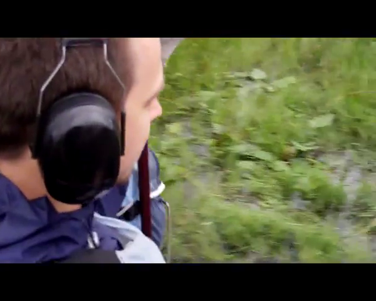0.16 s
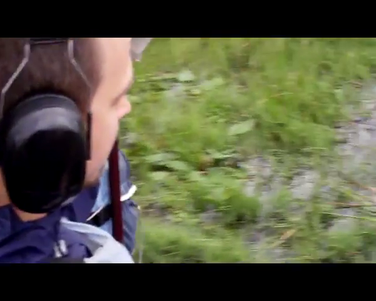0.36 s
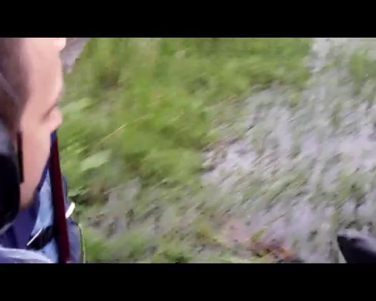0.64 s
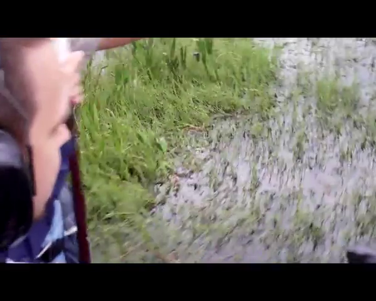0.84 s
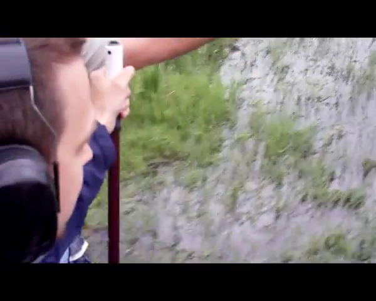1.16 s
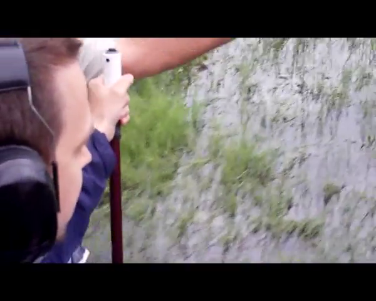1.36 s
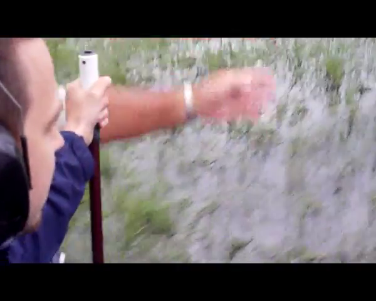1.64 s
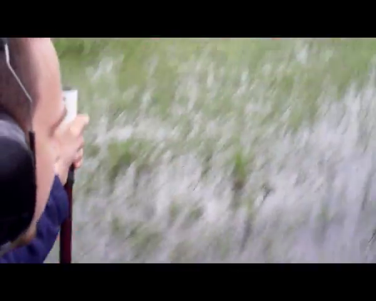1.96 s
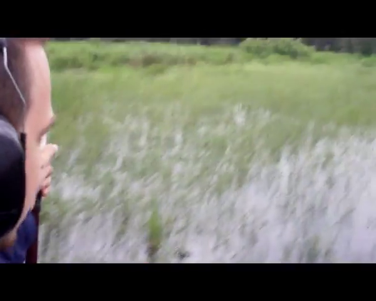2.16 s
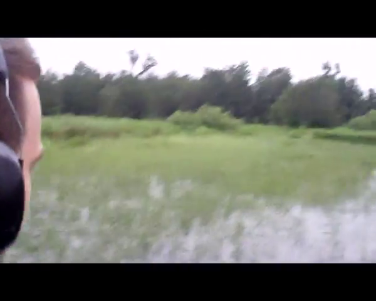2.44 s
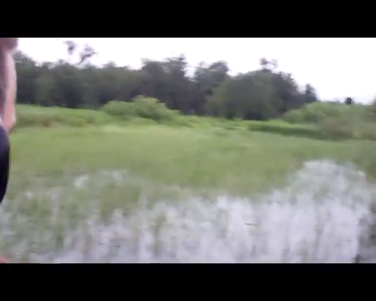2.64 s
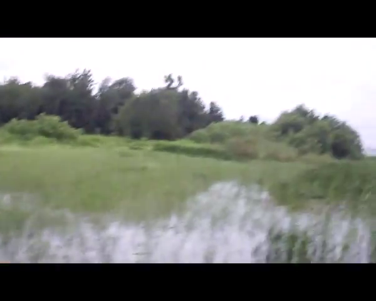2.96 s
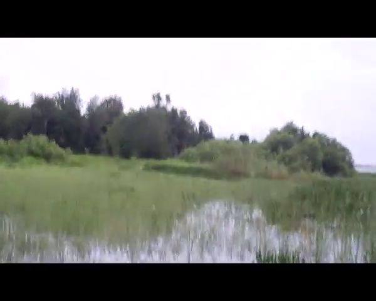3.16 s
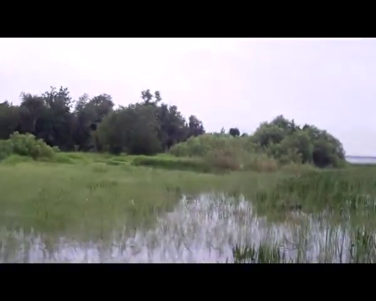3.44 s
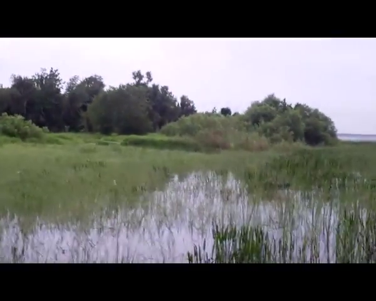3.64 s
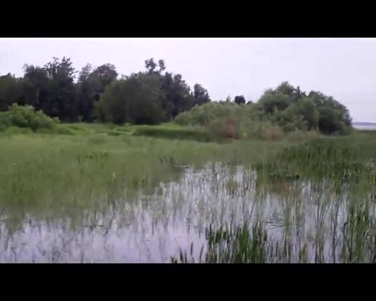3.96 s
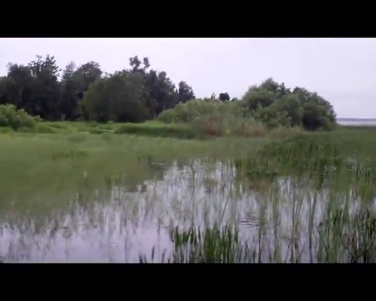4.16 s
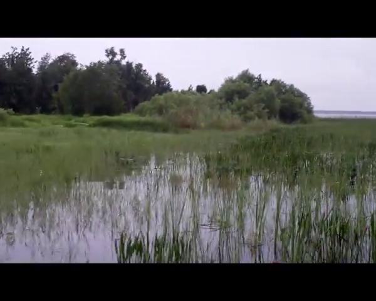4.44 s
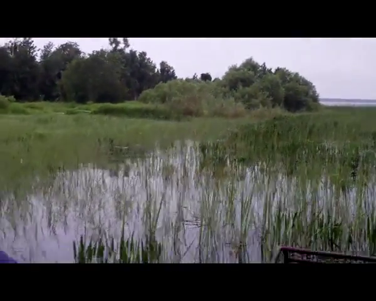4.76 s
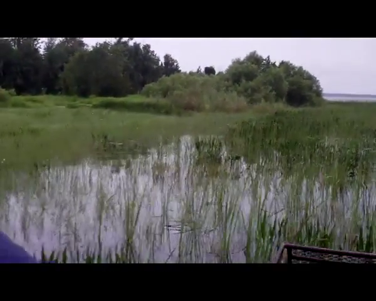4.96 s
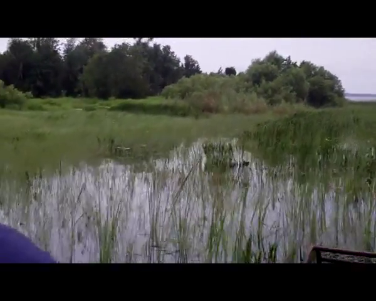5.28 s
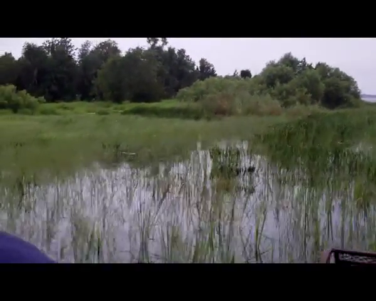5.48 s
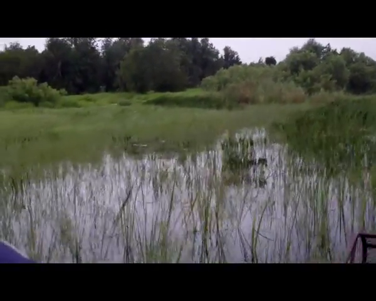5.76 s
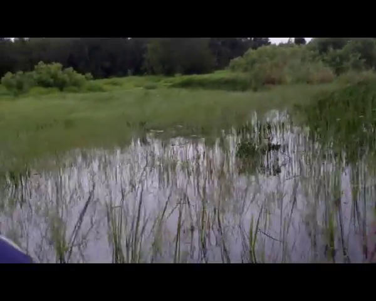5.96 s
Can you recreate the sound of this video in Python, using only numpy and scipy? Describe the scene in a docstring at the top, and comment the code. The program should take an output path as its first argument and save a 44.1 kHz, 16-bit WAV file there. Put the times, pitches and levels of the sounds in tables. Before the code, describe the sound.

A loud airboat engine and big propeller fill the whole six seconds, heard from on board in an open flooded marsh through a small handheld microphone. The exhaust is a dense, raspy buzz with strong low-mid harmonics, wrapped in rough, hissing blade and spray noise that flutters with each rapid firing, with tiny irregular pops. It begins loud, drops slightly at about 0.15 s, and the pitch sags until about 1 s, with brief midrange surges near 0.5 and 0.8 s. From 1.4 to 2.8 s the note slowly recovers while the colour shifts as the microphone turns sideways. Sharp little crackles come near 2.8 and 3.1-3.3 s. Around 3-3.7 s the throttle opens and the pitch climbs clearly; from 4 s it holds a higher, steady drone, slightly softer, cutting off still running. The sound is thin in deep bass, nearly centred, leaning slightly left later.

```python
"""A flooded marsh: an airboat engine drives a large propeller, heard on board by a small hand-held camera.
The firing note sags, then climbs as the throttle opens; the camera turns from the engine side to the bow,
which recolours exhaust and roar. Exhaust: sines at orders of the firing rate. Blades and spray: shaped noise
that rasps with each firing. Pops: one short cycle per firing. Left and right differ mainly in the lower range."""
import sys
import numpy as np
from scipy import signal
from scipy.io import wavfile
from scipy.ndimage import uniform_filter1d

SR = 44100
rng = np.random.default_rng(int(sys.argv[2]) if len(sys.argv) > 2 else 0)


def boost(x):
    """Linear amplitude factor 10**(x/20) for a level x in decibels (scalar or array-like)."""
    u = np.asarray(x, float) / 20
    return 10 ** u


def store_pcm(level_fs):
    """Save levels as 16-bit WAV."""
    pcm = np.round(np.clip(level_fs, -1, 1) * 32767).astype(np.int16)
    wavfile.write(sys.argv[1], SR, np.atleast_2d(pcm).T)


N = 269451
HOP = 256
STFT = dict(fs=SR, nperseg=1024, noverlap=1024 - HOP)

# engine firing: (time [s], rate [Hz])
FIRING_HZ = [(0.0, 111.0), (0.03, 111.6), (0.36, 107.8), (0.82, 106.1), (1.22, 106.1), (1.43, 107.1),
             (1.87, 108.4), (2.48, 109.3), (2.5, 109.9), (2.79, 110.6), (3.03, 113.5), (3.35, 121.6),
             (3.5, 124.3), (3.73, 126.7), (4.12, 128.5), (4.87, 129.2), (5.92, 128.6), (6.11, 129.0)]
# camera turn: (time [s], heading [0 back, 1 sideways, 2 turning forward, 3 bow])
CAMERA_HEADING = [(0, 0), (1.5, 0), (1.9, .44), (2.3, 1), (2.9, 1.04), (3.3, 2), (3.7, 2.5), (3.85, 3),
                  (6.11, 3)]


def curve(rows, t):
    """Reads a two-column table at times t."""
    return np.interp(t, *np.transpose(rows))


def evened(x):
    """Scales to rms 1."""
    return x / np.sqrt(np.mean(abs(x) ** 2) + 1e-20)


def bell(t, centre_s, length_s):
    """Gaussian bump, 1/e at length_s from its centre."""
    return np.exp(-((t - centre_s) / length_s) ** 2)


def band(x, order, edge_hz, kind, zero_phase=True):
    """Butterworth filter, run both ways if zero_phase."""
    sos = signal.butter(order, edge_hz, kind, fs=SR, output="sos")
    return signal.sosfiltfilt(sos, x) if zero_phase else signal.sosfilt(sos, x)


def by_heading(rows, t):
    """Blends rows of four values along the camera's heading: rows x times."""
    heading = np.clip(curve(CAMERA_HEADING, t), 0, 3)
    return np.array([np.interp(heading, np.arange(len(row)), row) for row in rows])


def across_hz(rows, hz):
    """Spreads a table of spectra over hz, on a log frequency axis."""
    f, *columns = np.transpose(rows)
    return np.transpose([np.interp(np.log(hz + 1), np.log(f), column) for column in columns])


def level_db(t):
    """Level of the whole sound at the camera: a slow curve plus set drops that creep back exponentially."""
    # slow part: (time [s], level [dB])
    slow_level = [(0, -17), (.6, -20), (1.5, -19), (2.3, -18.5), (2.8, -18.5), (3.25, -16), (3.8, -17.5),
                  (4.4, -17.5), (5, -18.5), (5.5, -19), (5.9, -18.5), (6.11, -20)]
    # the level drops at once: (time [s], change [dB])
    drops = [(0.149, -2), (2.8, -2.5), (3.275, -2.5)]
    fall_s, return_s = 0.01, 1.78
    db = curve(slow_level, t)
    for s, drop_db in drops:
        fall = np.clip((t - s) / fall_s, 0, 1)
        db = db + drop_db * fall * np.exp(-np.maximum(t - s, 0) / return_s)
    return db


def roar(turns):
    """Blade and spray turbulence: patchy noise whose middle range rasps with firings of uneven strength."""
    # spectrum of the roar: (frequency [Hz], density at headings 0, 1, 2, 3 [dB per Hz])
    roar_spectrum = [(60, -87, -86, -87, -86), (110, -65, -89, -62, -66), (165, -67, -72, -66, -65),
                     (220, -61, -60, -60, -57), (320, -50, -52.5, -46.5, -49.5),
                     (684, -44.5, -43, -43, -42), (1000, -37.5, -36.5, -37.5, -37.5),
                     (1410, -37, -35, -36.5, -37.5), (1860, -40.5, -39, -36.5, -40.5),
                     (2640, -49.5, -40.5, -42.5, -45), (2910, -45.5, -42.5, -39.5, -42),
                     (4310, -44, -50.5, -54, -51.5), (4670, -51.5, -53, -56, -56.5),
                     (5710, -52.5, -56, -57.5, -56.5), (11120, -74, -73.5, -78, -75.5)]
    # the microphone's shadow shifts as it turns: (time [s], treble [dB], presence [dB])
    mic_shadow = [(0, -3.5, 1.5), (.14, -4, 0.5), (.17, -4, -1), (.6, -1.5, 0), (1.6, -2.5, -1.5),
                  (1.95, 1, -2), (2.35, 1.5, 1), (2.85, -1, 0.5), (3.3, -1.6, -1), (4.6, -2, -0.5),
                  (5.05, -1.5, -3), (5.35, -1, -1), (6.11, 2.5, -2)]
    patchy_db, flicker_db = 0.4, 0.57  # rms
    presence_hz, treble_hz = 2360, 4140
    throb_hz, throb, triple, uneven = [900, 5500], 0.32, 0.4, 0.25

    hz, t, z = signal.stft(rng.standard_normal((2, N)), **STFT)
    patches = uniform_filter1d(rng.standard_normal(z.shape[1:]), size=14, axis=0)
    patches = evened(uniform_filter1d(patches, size=4, axis=1))
    flicker = evened(uniform_filter1d(rng.standard_normal(len(t)), size=2))

    above_presence, treble = (1 / (1 + (edge / (hz[:, None] + 1)) ** 8) for edge in (presence_hz, treble_hz))
    s, treble_db, presence_db = np.transpose(mic_shadow)
    shadow_db = (above_presence - treble) * np.interp(t, s, presence_db)
    shadow_db += treble * np.interp(t, s, treble_db)

    db = by_heading(across_hz(roar_spectrum, hz), t) + shadow_db
    db += patchy_db * patches + flicker_db * flicker
    noise = signal.istft(z * boost(db) * np.sqrt(SR / 2), **STFT)[1][:, :N]

    strength = 1 + uneven * rng.standard_normal(N)[turns.astype(int)]  # one value per firing
    puff = strength * np.sin(np.pi * turns) ** 4 - 3 / 8
    puff -= triple * np.cos(6 * np.pi * turns)  # finer rasp, three to a firing
    return noise + throb * puff * band(noise, 2, throb_hz, "band")


def pops(turns):
    """Each firing gives a one-cycle pop, pull then push, most small, sizes by chance; stray peaks join them."""
    # stray sharp peaks: (time [s], peak before the high-pass [dB])
    stray_peaks = [(.1363, -20), (.1454, -6), (.488, -11), (2.7845, -7), (2.7872, -10), (2.7951, -10),
                   (3.1305, -8), (3.2616, -14), (3.2775, -15)]
    pop_s, jitter_s = 0.00012, .0007
    small_db, spread_db = -23.5, 2  # before the high-pass, at mean level

    t = np.arange(N) / SR
    fired = np.flatnonzero(np.diff((turns + .5).astype(int)))
    late, chance = rng.random((len(fired), 2)).T
    at = np.clip(fired + np.round((late - .5) * 2 * jitter_s * SR).astype(int), 0, N - 1)
    size_db = small_db + spread_db * np.minimum(-np.log(1 - chance), 4)
    train = np.zeros(N)
    train[at] = boost(size_db + level_db(at / SR) - level_db(t).mean())
    for s, db in stray_peaks:
        train[round(s * SR)] = boost(db)
    u = np.arange(-60, 61) / SR / pop_s
    pop = u * np.exp(.5 - u ** 2 / 2)
    return band(np.convolve(train, pop, "same"), 2, 650, "high")


def exhaust(turns):
    """Sines locked to the firing; higher orders waver more, pipes and echoes scatter their phases."""
    # strongest orders: multiples of the firing rate
    strong_orders = [2, 3, 4, 5, 6, 8]
    # fixed peaks and hollows of pipes and hull that they slide through: (frequency [Hz], level [dB])
    pipe_response = [(212, -39), (223, -30), (245, -22), (258, -18), (318, -16), (326, -15.5), (335, -22),
                     (360, -8.5), (388, -9.5), (426, -15.5), (445, -11), (455, -19), (485, -13), (505, -24),
                     (516, -18), (535, -14), (560, -17), (630, -23), (645, -16), (665, -11.5), (690, -22),
                     (730, -15), (772, -20), (852, -12), (885, -19), (970, -13), (1032, -8)]
    # change of each strong order while looking sideways [dB]
    sideways_db = [-1, 0.2, -4, 0.5, -1.5, 2]
    # change of each strong order while looking at the bow [dB]
    at_bow_db = [-0.1, 0, 1.3, -4.5, 1.5, -2.1]
    # other orders, quarters from uneven cylinders:
    # (multiple of firing rate, rounded to quarters below, level at headings 0, 1, 2, 3 [dB])
    weak_orders = [(1.0, -39.5, -35, -33.5, -31), (1.25, -45, -40.5, -40.0, -42.5),
                   (1.5, -61, -53, -47, -57), (1.75, -45, -46, -45, -43), (2.25, -42.5, -35, -44, -51),
                   (2.5, -32.5, -32, -32, -21.5), (2.75, -34, -38, -28, -24), (3.25, -31, -31, -31, -33.5),
                   (4.25, -30, -46, -40, -28), (7.0, -17.5, -14, -12.5, -13), (9.0, -14, -21, -15, -9),
                   (10.0, -16, -16, -13, -13.5), (11.0, -18, -16.5, -12, -14.5),
                   (12.0, -14, -14, -23, -26.5), (13.0, -13, -20, -14, -18), (14.0, -15.5, -16, -17, -15),
                   (15.0, -17, -24.5, -15, -13.5), (15.9, -14.5, -14, -12, -14),
                   (16.92, -17.5, -14.5, -17, -20), (17.88, -21, -10, -34, -29),
                   (19.12, -22.5, -19, -29, -20.5), (20.04, -21, -23, -24, -21),
                   (21.04, -34, -19, -29, -23), (21.73, -32, -32, -29, -26), (23.14, -29, -31, -36, -26),
                   (24.6, -46, -28, -42, -31), (26.5, -42, -37, -34, -29), (27.3, -42, -36, -39, -35)]
    # half orders from strong-weak firing: (frequency [Hz], level at headings 0, 1, 2, 3 [dB])
    half_orders = [(400, -33, -34, -33, -44), (520, -32.5, -27, -27, -34), (794, -25, -21.5, -31, -25.5),
                   (1250, -20.5, -18.5, -14, -25), (1700, -20.5, -16, -21, -24), (2010, -20, -22, -25, -24),
                   (2580, -34, -25, -35, -33)]
    # orders swell or fade as the camera shifts among echoes: (time [s], order, change [dB], length [s])
    order_fades = [(2.3, 18, -5, .25), (2.75, 17, 3, .25), (3.85, 16, 3, .35), (5.0, 11, -4, .3),
                   (4.3, 7, -2, .3), (5.3, 13, -4, .3), (.7, 14, 3, .3), (4.6, 8, -3, .08),
                   (5.35, 9, -2, .08), (5.95, 2, -2, .2), (0.13, 2, 2, 0.25), (0.33, 4, 1.5, 0.17),
                   (.3, 6, 3, .15), (4.1, 6, -6, .2), (4.7, 6, -2, 0.16), (5.24, 6, 2.5, 0.16),
                   (6, 7, 2.5, .1), (5.5, 7, 2.5, 0.083), (5.03, 8, 3.5, .25), (5.6, 5, -2, .2),
                   (3.48, 8, -2, 0.17), (3.55, 9, -3, .1), (1.44, 9, 2.5, 0.092), (1.83, 10, -6, .1),
                   (3.48, 10, 4.5, .12), (5.94, 15, 4.5, 0.34), (3.95, 11, 5.5, .15), (0.96, 8, -4.5, 0.12),
                   (3.7, 5, -4, .15), (0.29, 3, -12, 0.18), (2.58, 3, -2, 0.12), (0.99, 4, 1, 0.17),
                   (5.95, 4, -8, 0.21), (1.22, 5, -5, 0.16), (3.14, 5, 7, 0.086), (1.56, 6, -8, 0.15),
                   (2.1, 6, -4.5, 0.23), (2.5, 6, 1.5, 0.15), (3.6, 6, -7, 0.24), (5.95, 6, -13, .12),
                   (1.1, 7, -5, 0.19), (2.1, 7, -6, 0.16), (2.9, 7, -6, 0.13), (3.57, 7, -8, 0.15),
                   (.05, 8, 5, .12), (0.57, 8, 3.5, 0.13), (1.72, 8, -7, 0.21), (2.83, 8, -6, 0.23),
                   (0.22, 9, -10, .1), (1.92, 9, 7, .12), (3.5, 9, 4, .15), (0.66, 10, -10, 0.19),
                   (5.03, 10, -10, 0.22), (0.12, 14, -14.5, 0.26), (0.32, 12, -16, 0.24), (5.9, 12, 10, .3),
                   (2.55, 13, -8, .15), (4.07, 13, 5.5, .2)]
    waver_share, waver_hz, steadiness = [.75, .95, 1., .3], 14., 1.45  # share of power at order 21, by heading
    pulse_order, pulse_smear_rad, smear_rad = 16.9, .9, 2.5  # close phases above pulse_order: firings click

    t = np.arange(0, N + HOP, HOP) / SR
    firing_hz, heading = curve(FIRING_HZ, t), curve(CAMERA_HEADING, t)
    halves = np.arange(3, 24) + .5
    orders = np.r_[strong_orders, [round(4 * row[0]) / 4 for row in weak_orders], halves]

    f, pipe_db = np.transpose(pipe_response)
    strong_db = np.interp(np.log(np.outer(strong_orders, firing_hz)), np.log(f), pipe_db)
    strong_db += np.outer(sideways_db, np.maximum(1 - abs(heading - 1), 0))
    strong_db += np.outer(at_bow_db, np.clip(heading - 2, 0, 1))
    weak_db = np.r_[[row[1:] for row in weak_orders], across_hz(half_orders, halves * firing_hz.mean())]
    db = np.r_[strong_db, by_heading(weak_db, t)]
    for s, order, fade_db, length_s in order_fades:
        db[orders == round(order)] += fade_db * bell(t, s, length_s)

    # complex drift: amplitude and phase waver together
    chance = rng.standard_normal((len(orders), 3 * len(t), 2)) @ [1, 1j]
    slow = signal.filtfilt(*signal.butter(1, 2 * waver_hz * HOP / SR), chance, axis=1)
    drift = evened(slow[:, len(t):-len(t)])
    share = np.clip(by_heading(np.outer((orders / 21) ** steadiness, waver_share), t), 0, 1)
    sizes = boost(db) * (np.sqrt(1 - share) + np.sqrt(share) * drift)

    lags_rad = np.where(orders > pulse_order, pulse_smear_rad, smear_rad) * rng.standard_normal(len(orders))
    out, fine_t = np.zeros(N), np.arange(N) / SR
    for order, size, lag in zip(orders, sizes, lags_rad):
        phase = 2 * np.pi * order * (turns + .5) + lag
        out += (np.interp(fine_t, t, size) * np.exp(1j * phase)).real
    return np.sqrt(2) * out


def dip_db(t):
    """Regular brief dips of the left side against the right; one is left out."""
    depth_db, first_s, every_s, length_s = -.8, .22, .5, .045
    since = (t - first_s + every_s / 2) % every_s - every_s / 2
    return depth_db * np.exp(-(since / length_s) ** 4) * ((t < 2.5) | (t > 3.0))


def sides(mid, apart):
    """Half the left-right difference: kept below a moving edge, and above it only in brief scattered patches."""
    # balance below the edge: (time [s], left minus right [dB])
    balance = [(0, .6), (.15, .6), (.17, 0), (2.77, 0), (2.81, 1.2), (3.27, 1.2), (3.33, 1.9), (4.3, 1.9),
               (4.7, 1.1), (5.95, 1), (6.03, -1), (6.11, -1)]
    # noise opposite in left and right: (frequency [Hz], gain before the weights below [dB])
    apart_spectrum = [(60, -14), (200, -20), (600, -17), (1500, -14.5), (3500, -13.5), (9000, -10)]
    least_edge_hz, edge_hz_per_db = 2600, 2900  # edge is higher for a larger left excess
    patches_per_s, patch_db = 32, 5  # count within 260 bins

    hz, t, (z_mid, z_apart) = signal.stft([mid, apart], **STFT)
    pan_db, dip = curve(balance, t), dip_db(t)
    lean_db = np.where(pan_db > .8, pan_db, pan_db + dip)
    edge_hz = np.maximum(least_edge_hz, edge_hz_per_db * (pan_db + dip / 2))
    below_edge = 1 / (1 + (hz[:, None] / edge_hz) ** 16)
    off_centre = np.clip((abs(pan_db) + abs(dip)) / .4, 0, 1)

    # patches 16 bins by 4 frames
    odds = patches_per_s * 4 * HOP / SR * 16 / 260
    seeds = rng.random((len(hz) // 16 + 1, len(t) // 4 + 1)) < odds
    side_patches = np.kron(seeds, np.ones((16, 4)))[:len(hz), :len(t)]

    weights = np.maximum(below_edge * off_centre, boost(patch_db) * side_patches)
    apart_gain = boost(across_hz(apart_spectrum, hz)) * weights
    lean = np.tanh(lean_db * np.log(10) / 40)  # side over mid for this dB balance
    return signal.istft(below_edge * lean * z_mid + apart_gain * z_apart, **STFT)[1][:N]


def scene():
    """Engine and roar reach two close microphone ports almost alike; pops reach both equally."""
    # surges and dips in the middle range: (time [s], change [dB], length [s])
    surges = [(.36, 1.5, 0.035), (0.497, 4, 0.02), (.56, -1, .03), (0.657, 1.5, .04), (0.83, 3.5, 0.059),
              (1.243, 1, 0.33), (1.91, 1, 0.043), (2.533, 0.5, 0.033), (2.68, 1.2, .1), (2.902, 2, 0.04),
              (3.134, 1, 0.03), (3.999, 2, 0.064), (5.84, 0.5, 0.067)]
    t = np.arange(N) / SR
    turns = np.cumsum(curve(FIRING_HZ, t)) / SR  # firings so far
    shared, apart = roar(turns)
    mid = exhaust(turns) + shared
    surge_db = sum(db * bell(t, s, length_s) for s, db, length_s in surges)
    mid = mid + (boost(surge_db) - 1) * band(mid, 2, [550, 2500], "band")
    side = sides(mid, apart)
    return boost(level_db(t)) * np.array([mid + side, mid - side]) + pops(turns)


def roll_off(x):
    """The treble ends steeply here."""
    return signal.sosfilt(signal.butter(12, 11370, fs=SR, output="sos"), x)


def record(dry):
    """The small microphone cuts deep bass and top treble and adds faint low self-noise, partly shared."""
    thin = band(dry, 4, 85, "high", zero_phase=False)
    thin = signal.oaconvolve(thin, signal.firwin(255, 10850, fs=SR)[None], "same")
    white = rng.standard_normal(N) + .6 * rng.standard_normal(dry.shape)
    rumble = band(white, 5, 100, "low", zero_phase=False)
    mix = thin + boost(-76.0) * evened(rumble)
    return roll_off(mix)


dry = scene()
out = record(dry)
store_pcm(out)
```